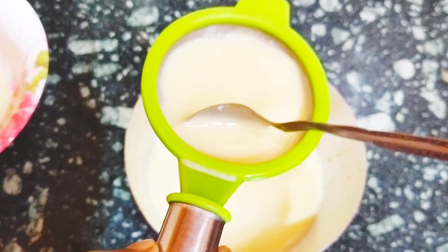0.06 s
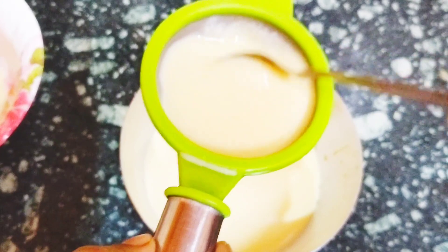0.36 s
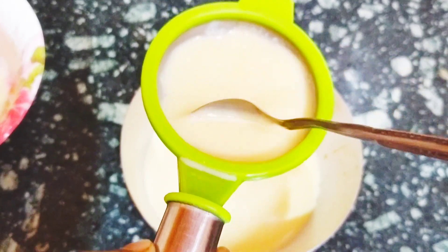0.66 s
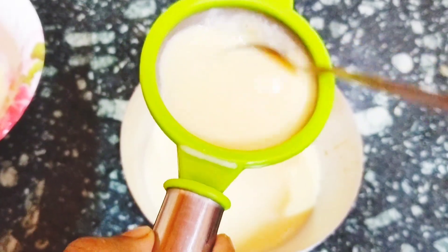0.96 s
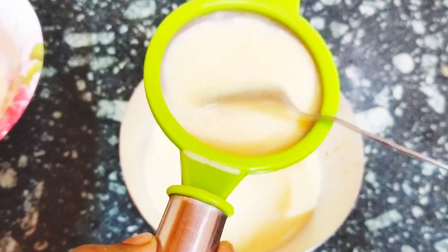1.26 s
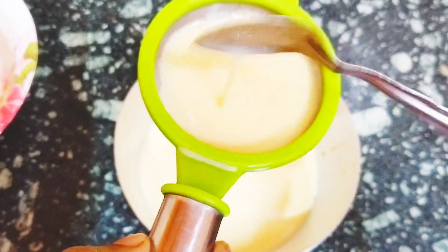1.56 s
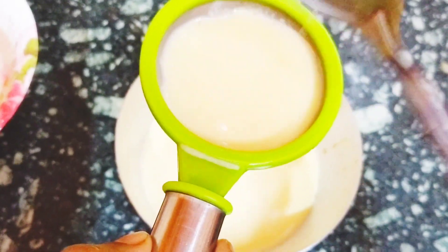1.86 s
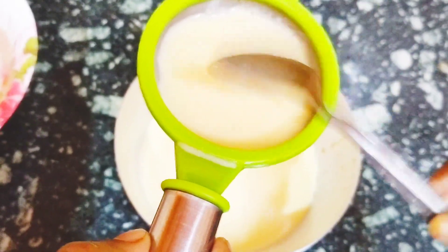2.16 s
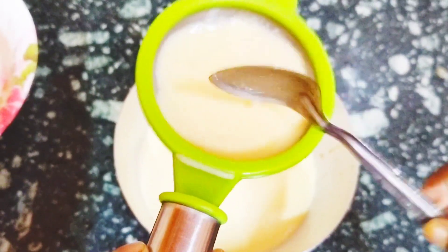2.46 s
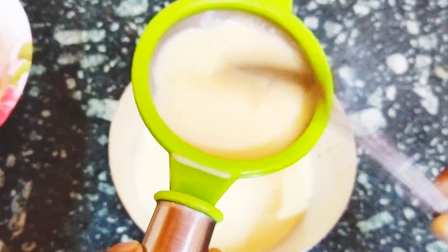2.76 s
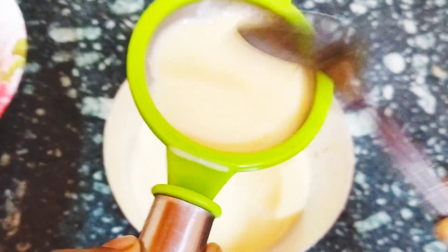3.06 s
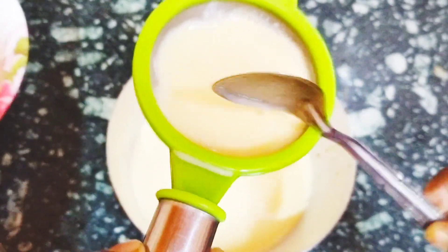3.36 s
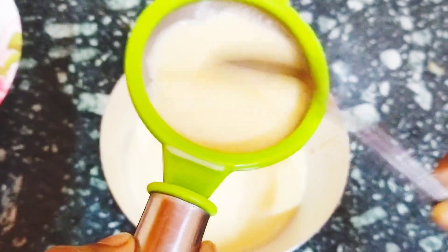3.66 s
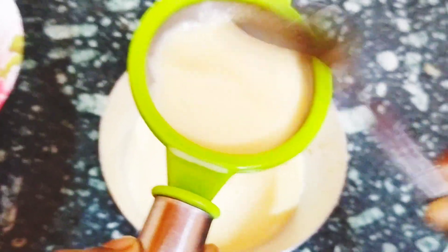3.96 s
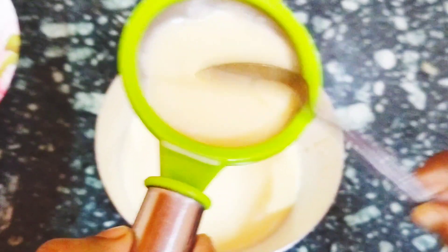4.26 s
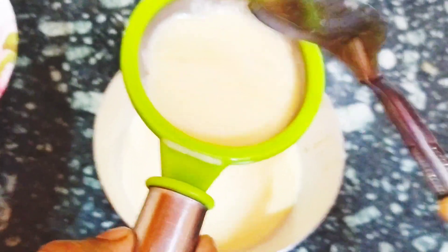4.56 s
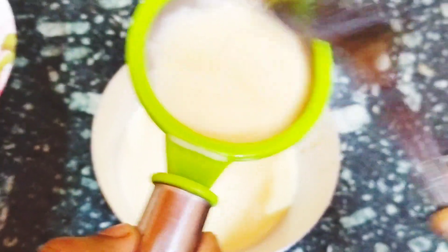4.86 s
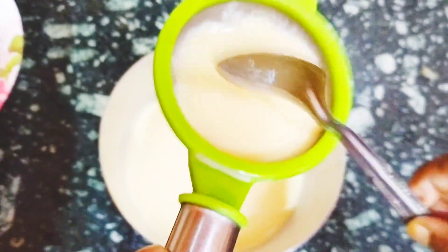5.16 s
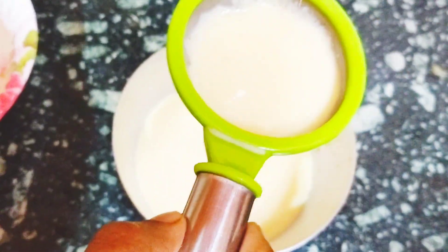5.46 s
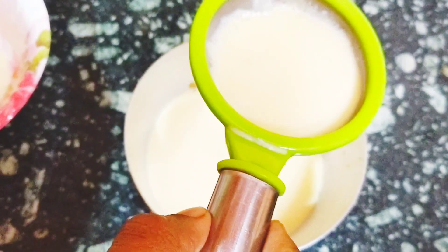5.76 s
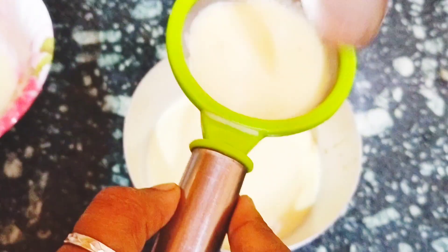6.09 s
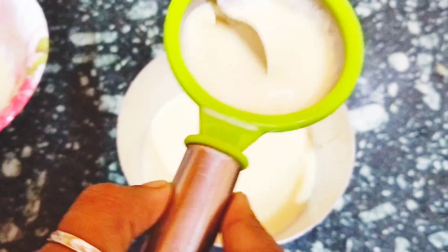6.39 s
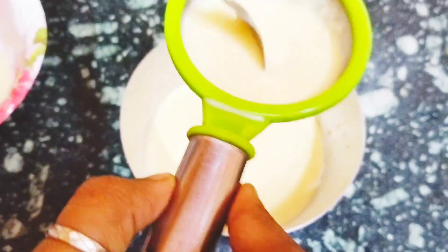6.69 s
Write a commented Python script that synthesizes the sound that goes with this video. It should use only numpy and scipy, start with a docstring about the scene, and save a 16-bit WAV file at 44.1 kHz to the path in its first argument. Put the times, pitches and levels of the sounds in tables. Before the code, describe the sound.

Quick, even taps of a steel spoon on a plastic-rimmed strainer, with faint wet stirring before and light scraping after.

```python
"""A small kitchen. A steel spoon stirs thick batter in a plastic-rimmed mesh strainer, with wet squelches,
then raps the rim about eight times a second to shake the batter through, ringing spoon, rim and frame.
Then it goes back to rubbing the mesh, rasping over the wires. Counter and walls answer the spoon.
Underneath: a low rumble, hands on the strainer, a room hum and, late on, spells of soft hiss."""
import sys
import numpy as np
from scipy import signal
from scipy.fft import rfft, irfft, next_fast_len
from scipy.io import wavfile
from scipy.ndimage import uniform_filter1d, map_coordinates

SR = 44100
rng = np.random.default_rng(int(sys.argv[2]) if len(sys.argv) > 2 else 0)


def to_wav(sig):
    """Store sig (one row per channel, or 1-D mono) as 16-bit WAV at the path in sys.argv[1].

    Samples outside -1..1 are clipped; the rate is SR.
    """
    pcm = np.clip(np.atleast_2d(sig), -1, 1) * 32767
    pcm = np.round(pcm).astype(np.int16)
    wavfile.write(sys.argv[1], SR, pcm.T)  # frames by channels


N = 305613


def amp(db):
    return 10 ** (np.asarray(db) / 20)


def unit(x):
    return x / np.sqrt(np.mean(x ** 2) + 1e-20)


def along(points, hz):
    """Interpolate (Hz, value) points on a log frequency axis."""
    knots_hz, values = np.transpose(points)
    return np.interp(np.log(hz + 1), np.log(knots_hz + 1), values)


def level(rows):
    """Gain per sample from (s, dB) rows, silent outside them."""
    s, db = np.transpose(rows)
    return amp(np.interp(np.arange(N) / SR, np.r_[s[0] - .03, s, s[-1] + .03], np.r_[-120, db, -120]))


def gestures(rows, attack_s, sag_db_per_s, release_db_per_s):
    """Gain per sample from (start s, length s, dB) rows: rise, sag, release."""
    gain = np.zeros(N)
    for start_s, length_s, db in rows:
        t = np.maximum(np.arange(N) / SR - start_s, 0)
        fall_db = sag_db_per_s * np.minimum(t, length_s) + release_db_per_s * np.maximum(t - length_s, 0)
        gain += np.minimum(t / attack_s, 1) * amp(db - fall_db)
    return gain


def wobble(rate_hz):
    """Smooth random curve, rate_hz knots a second."""
    knots = rng.standard_normal(int(N * rate_hz / SR) + 4)
    return map_coordinates(knots, [np.arange(N) * rate_hz / SR])


def filtered(x, response):
    """Zero-phase filter; response maps Hz to gain."""
    size = next_fast_len(len(x) + 8192)
    return irfft(rfft(x, size) * response(np.fft.rfftfreq(size, 1 / SR)), size)[:len(x)]


def coloured(x, spectrum):
    """x shaped by a (Hz, dB) spectrum, rms 1."""
    return unit(filtered(x, lambda hz: amp(along(spectrum, hz))))


def noise(spectrum):
    return coloured(rng.standard_normal(N), spectrum)


def add(track, start_s, sound):
    i = max(round(start_s * SR), 0)
    track[i:i + len(sound)] += sound[:max(len(track) - i, 0)]


def friction(spectrum, slips_per_s, spread_db, bed_gain):
    """Tiny uneven slips on a bed of smooth rubbing."""
    slips = (rng.random(N) < slips_per_s / SR) * rng.standard_normal(N)
    slips *= amp(spread_db * rng.standard_normal(N))
    return coloured(unit(slips) + bed_gain * rng.standard_normal(N), spectrum)


def patchy(x, depth_db):
    """Passing resonances: each narrow band swells and fades on its own."""
    bands = signal.stft(x, nperseg=512)[2]
    swell = uniform_filter1d(rng.standard_normal(bands.shape), size=3, axis=0)
    swell = uniform_filter1d(swell, size=7, axis=1)
    return unit(signal.istft(bands * amp(depth_db * unit(swell)), nperseg=512)[1][:N])


def ring(modes, t, attack_s, scatter_db, detune):
    """Damped modes; each blow lands elsewhere, shifting strengths and pitches a little."""
    hz, db, t60_s = np.transpose(modes)[:, :, None]
    strength, shift = rng.standard_normal((2, len(modes), 1))
    decay = amp(db + scatter_db * strength - 60 * t / t60_s)
    waves = decay * np.sin(2 * np.pi * hz * (1 + detune * shift) * t)
    return waves.sum(0) * (1 - np.exp(-t / attack_s))


# Rubbing spectrum in batter. Each row: frequency in Hz, relative level in dB.
BATTER_SPECTRUM = [(500, -29), (750, -29), (1000, -20), (1450, 2.5), (1950, -11), (2600, 3), (3500, 2.5),
                   (4400, -7.5), (5300, -25.5), (7000, -26.5), (9000, -32), (11500, -22), (15000, -61)]
# Spoon strokes. Each row: start in seconds, length in seconds, rub in dB, push on the strainer in dB.
BATTER_STROKES = [(-0.03, 0.13, -64.5, -58.5), (0.396, 0.18, -67, -70), (0.621, 0.11, -69.5, -87),
                  (0.98, 0.25, -67, -59), (1.373, 0.079, -72.5, -75)]


def stirring():
    """Spoon friction deep in the batter, which muffles it."""
    rubs = [(start_s, length_s, rub_db) for start_s, length_s, rub_db, _ in BATTER_STROKES]
    gain = gestures(rubs, attack_s=.029, sag_db_per_s=17, release_db_per_s=220)
    slips = friction(BATTER_SPECTRUM, slips_per_s=1200, spread_db=2, bed_gain=.7)
    return gain * amp(1.9 * wobble(29.4)) * patchy(slips, depth_db=4)


# Spectra of rumble and hand noise. Each row: frequency in Hz, relative level in dB.
RUMBLE_SPECTRUM = [(25, -36), (45, -17), (62, -7.5), (75, 3), (92, 3.5), (112, -6.5), (160, -24.5),
                   (300, -39), (1500, -120)]
HAND_SPECTRUM = [(90, -15), (170, -14.5), (300, 0), (430, -3.5), (600, -6.5), (800, -16), (1100, -14.5),
                 (2000, -33), (6000, -120)]
# Envelopes of rumble and hand noise. Each row: time in seconds, relative level in dB.
RUMBLE_ENVELOPE = [(1.56, -85), (1.6, -60.5), (1.99, -64.5), (2.31, -57), (2.59, -74), (2.65, -58.5),
                   (2.99, -68.5), (3.16, -56), (3.8, -58), (3.89, -64), (3.97, -59.5), (4.84, -56),
                   (5.22, -75), (5.67, -54.5), (6.44, -66.5), (6.47, -57.5), (6.85, -68), (6.93, -57)]
HAND_ENVELOPE = [(1.6, -87), (2.21, -72.5), (4.11, -75.5), (4.43, -71), (5.14, -74), (5.36, -91),
                 (5.56, -80), (5.74, -72.5), (6.61, -73), (6.85, -71)]


def rumble_and_hands():
    """Low rumble and hands shifting on the strainer; both swell with each stroke's push."""
    pushes = [(start_s, length_s, push_db) for start_s, length_s, _, push_db in BATTER_STROKES]
    push = gestures(pushes, attack_s=.015, sag_db_per_s=2.9, release_db_per_s=71)
    rumble = (amp(1.5) * level(RUMBLE_ENVELOPE) + push) * noise(RUMBLE_SPECTRUM)
    hand_gain = amp(4) * level(HAND_ENVELOPE) + amp(-9) * push
    return rumble + hand_gain * amp(1.9 * wobble(18)) * noise(HAND_SPECTRUM)


# Room hum tones, drone spectrum and air spectrum. Each row: frequency in Hz, relative level in dB.
HUM_TONES = [(380, -2), (565, -11.5), (1440, -26), (2180, -27.5)]
DRONE_SPECTRUM = [(100, -2.5), (210, -26.5), (290, -21.5), (360, 5.5), (410, 3.5), (480, -4.5), (570, 1),
                  (700, -24), (1000, -43.5), (2000, -50.5), (4000, -56.5)]
AIR_SPECTRUM = [(100, 6.5), (800, -17.5), (1500, 7.5), (4500, -33), (5500, -5.5), (6400, 13.5), (7500, 0.5),
                (15000, -8.5)]


def room_hum():
    """Hollow drone with a few wavering tones, over faint still air."""
    t = np.arange(N) / SR
    tones = sum(amp(db + 3 * wobble(8)) * np.sin(2 * np.pi * hz * t + 1.3 * wobble(16))
                for hz, db in HUM_TONES)
    drone = amp(3.2 * wobble(12)) * noise(DRONE_SPECTRUM)
    return amp(-72) * (drone + tones) + amp(-96) * noise(AIR_SPECTRUM)


# Counter and wall reflections. Each row: delay in seconds, gain in dB.
REFLECTIONS = [(.003, -27.5), (.0072, -16.5), (0.0094, -19.5), (0.0184, -27.5)]
# Room tail spectrum. Each row: frequency in Hz, relative level in dB.
TAIL_SPECTRUM = [(200, 2.5), (1100, 2), (1600, -0.5), (2200, 6.5), (2750, 3), (3080, -2), (3450, 0.5),
                 (3850, 3.5), (4500, -11.5), (7000, 0.5), (10000, 1), (14000, 3.5)]
# Room decay. Each row: frequency in Hz, T60 in seconds.
TAIL_T60_S = [(200, 0.57), (1000, 0.37), (3000, 0.2), (6000, 0.35), (10000, 0.22), (15000, 0.16)]


def kitchen(x, tail_db, build_s):
    """Direct sound, near reflections and a diffuse tail that builds up, then dies by band."""
    hz, t, bands = signal.stft(rng.standard_normal(SR // 3), SR, nperseg=256)
    band_db = along(TAIL_SPECTRUM, hz)[:, None] - 60 * t / along(TAIL_T60_S, hz)[:, None]
    tail = signal.istft(bands * amp(band_db), SR, nperseg=256)[1]
    tail *= 1 - np.exp(-np.arange(len(tail)) / SR / build_s)
    response = amp(tail_db) * tail / np.linalg.norm(tail)
    response[0] += 1
    for delay_s, db in REFLECTIONS:
        response[round(delay_s * SR)] += amp(db)
    return signal.fftconvolve(x, response)


# Squelches and squeaks. Each row: start in seconds, level in dB, pitch in Hz, width in Hz,
# length in seconds.
WET_SQUELCHES = [(0.151, -67.5, 3360, 600, 0.033), (0.485, -75.5, 7200, 1800, 0.038),
                 (0.764, -65.5, 3180, 600, 0.0072), (0.994, -58.5, 2620, 1220, 0.026),
                 (0.99, -75, 11300, 1600, 0.04), (1.41, -61.5, 2260, 1000, 0.012),
                 (4.77, -47.5, 2460, 262, 0.02), (4.797, -61, 2650, 250, 0.023),
                 (5.008, -56, 1460, 304, 0.015), (5.019, -51.5, 1177, 504, 0.027),
                 (6.339, -48, 2640, 1800, 0.016), (6.382, -56, 2880, 200, 0.027),
                 (6.442, -61.5, 2800, 120, 0.02), (6.518, -57, 3030, 360, 0.053),
                 (6.829, -54.5, 3580, 199, 0.071)]


def squelches():
    """Brief narrow-band bursts as the wet spoon sticks and lets go."""
    out, t = np.zeros(N), np.arange(SR // 4) / SR
    for start_s, db, pitch_hz, width_hz, length_s in WET_SQUELCHES:
        white = rng.standard_normal(len(t))
        band = unit(filtered(white, lambda hz: 1 / (1 + (.72 * (hz - pitch_hz) / width_hz) ** 2) ** 2))
        peak_s = length_s / 3
        add(out, start_s, amp(db) * band * t / peak_s * np.exp(1 - t / peak_s))
    return out


# Modes of the spoon, the rim with its mesh, and the hand-damped plastic frame.
# Each row: frequency in Hz, relative level in dB, T60 in seconds.
SPOON_MODES = [(4640, -10, .008), (5450, -21, .006), (8130, -29, .008), (9000, -22, .008),
               (11750, -22, .006), (13600, -22, .005), (4002, -24, .035), (4370, -6, .012),
               (6400, -32, .035), (10235, -25, .04), (10330, -27, .09)]
RIM_MODES = [(2260, -27, .025), (2510, -20, .02), (3100, 2, .005), (2785, -19, .03), (3045, -14, .022),
             (3340, -15, .026), (3625, -27, .028)]
FRAME_MODES = [(286, -22, 0.036), (962, -31, 0.054), (1064, -17, 0.032), (1437, -33, 0.022),
               (1570, -40, 0.0053)]
# Contact spectrum. Each row: frequency in Hz, relative level in dB.
CRACK_SPECTRUM = [(60, -34), (250, -10.5), (700, -18), (1500, -6.5), (2100, -5), (3000, 7), (5000, -5),
                  (6200, -20.5), (7500, -21.5), (8600, -7), (10000, -3), (11300, -5.5), (13900, -6),
                  (15600, -30.5)]
# Blows on the rim. Each row: start in seconds, overall gain in dB, relative rim clack in dB.
RIM_RAPS = [(1.6684, -28, -7), (1.8365, -28.5, -2.5), (1.9908, -30, -1.5), (2.1298, -27, -1.5),
            (2.247, -24.5, -1), (2.388, -24, 1), (2.5236, -25.5, 1.5), (2.6579, -24, -1),
            (2.7833, -22, -3.5), (2.9234, -23, -3.5), (3.0553, -22.5, -9), (3.192, -22, -9.5),
            (3.3113, -25.5, -6.5), (3.4266, -24.5, -4.5), (3.5734, -23, -4), (3.6874, -22, -1.5),
            (3.7997, -23, 1), (3.939, -23.5, -3.5), (4.0598, -25, 0.5), (4.1896, -21, -1),
            (4.3093, -20.5, -3.5), (4.4491, -20.5, -13), (4.5646, -23, -8.5), (4.6946, -20.5, -6.5),
            (4.8226, -22, 1), (4.9797, -24.5, -11.5), (5.1056, -24, 2), (5.2194, -23, -1)]


def raps():
    """Each blow rings spoon, rim and frame and shivers the mesh; squarer hits clack louder."""
    out, t = np.zeros(N), np.arange(SR // 8) / SR
    shiver = (1 - np.exp(-t / .00041)) * (amp(-60 * t / .024) + amp(-14 - 60 * t / .12))
    for start_s, db, clack_db in RIM_RAPS:
        spoon = ring(SPOON_MODES, t, attack_s=.0005, scatter_db=1, detune=.0015)
        rim = ring(RIM_MODES, t, attack_s=.0005, scatter_db=.8, detune=.003)
        frame = ring(FRAME_MODES, t, attack_s=.0015, scatter_db=1, detune=.015)
        crack = shiver * coloured(rng.standard_normal(len(t)), CRACK_SPECTRUM)
        blow = amp(7) * spoon + amp(clack_db + 12.5) * rim + amp(.14 * clack_db) * frame + amp(-5) * crack
        add(out, start_s + .00052, amp(db) * kitchen(blow, tail_db=-7.5, build_s=.0012))
    return out


# Hiss spectrum. Each row: frequency in Hz, relative level in dB.
HISS_SPECTRUM = [(88, -49), (150, 5.5), (228, -5), (263, 2.5), (340, -31), (372, -2), (454, -3.5),
                 (575, -1.5), (641, -4), (2010, -10), (3110, -9), (3600, -1.5), (5360, -23.5),
                 (8600, -12.5), (11500, -31), (15000, -32), (22000, -120)]
# Spells of hiss. Each row: start in seconds, length in seconds, relative level in dB.
HISS_SPELLS = [(5.405, 0.068, -67.5), (5.52, 0.49, -62.5), (6.215, 0.21, -64), (6.51, 0.1, -65.5),
               (6.655, 0.013, -60.5), (6.725, 0.4, -60)]


def hiss():
    """Soft, grainy, flickering hiss after the raps."""
    gain = gestures(HISS_SPELLS, attack_s=.012, sag_db_per_s=.6, release_db_per_s=105)
    grains = friction(HISS_SPECTRUM, slips_per_s=2400, spread_db=4.5, bed_gain=1.33)
    return gain * amp(2.5 + 1.1 * wobble(30)) * patchy(grains, depth_db=3.5)


# Wire rasp spectrum. Each row: frequency in Hz, relative level in dB.
MESH_SPECTRUM = [(5000, -32), (8000, -70), (9500, 16), (13500, 6), (15500, 2)]
# Scrapes. Each row: start in seconds, length in seconds, relative level in dB.
MESH_SCRAPES = [(6.332, 0.074, -68.5), (6.44, 0.016, -75), (6.52, 0.081, -67.5), (6.665, 0.025, -68),
                (6.73, .2, -70.5)]


def scrapes():
    """The spoon rasps over bare wires."""
    gain = gestures(MESH_SCRAPES, attack_s=.011, sag_db_per_s=12, release_db_per_s=490)
    slips = friction(MESH_SPECTRUM, slips_per_s=1500, spread_db=2, bed_gain=.6)
    return amp(1.1) * gain * patchy(slips, depth_db=2.5)


def scene():
    """Mono mix of the spoon in the room and the background."""
    rubbing = kitchen(stirring() + squelches() + scrapes(), tail_db=-10.5, build_s=.0032)[:N]
    return (rubbing + rumble_and_hands() + room_hum() + raps() + hiss())[None]


def record(dry):
    """A small microphone loses the deepest bass; a steep band limit cuts the top."""
    bottom_hz, top_hz = 48, 15600
    thin = signal.sosfilt(signal.butter(2, bottom_hz, "highpass", fs=SR, output="sos"), dry[0])
    return filtered(thin, lambda hz: 1 / (1 + (hz / top_hz) ** 120))[None]


dry = scene()
out = record(dry)
to_wav(out)
```